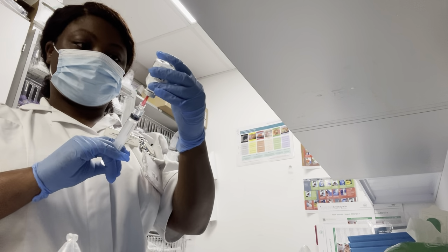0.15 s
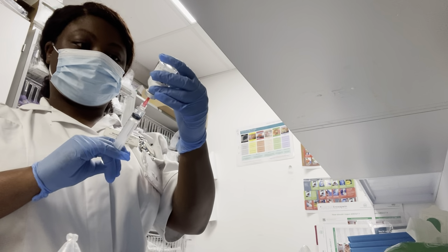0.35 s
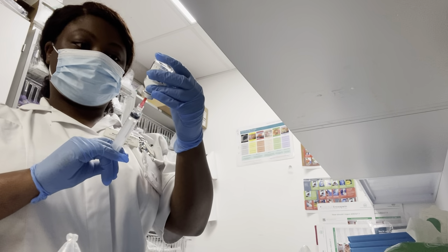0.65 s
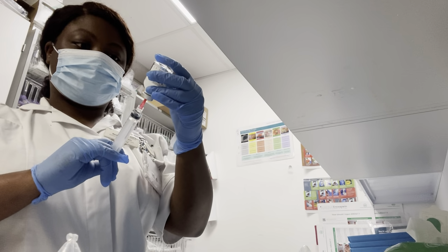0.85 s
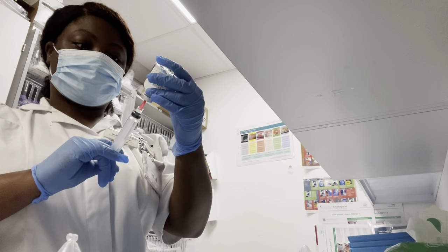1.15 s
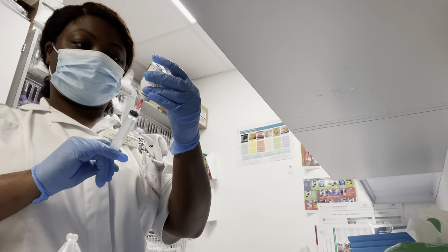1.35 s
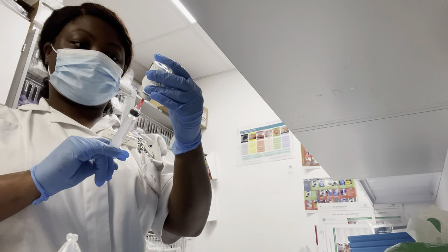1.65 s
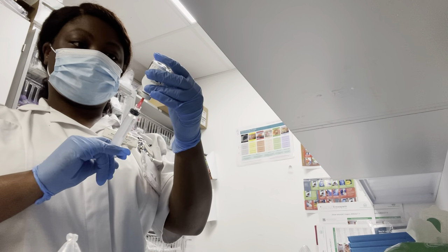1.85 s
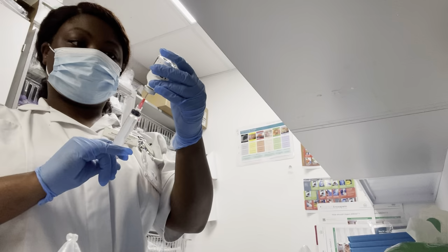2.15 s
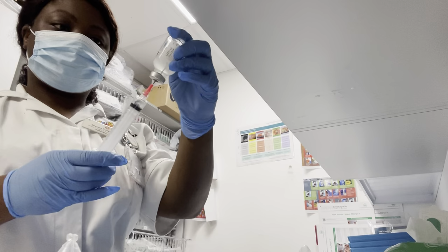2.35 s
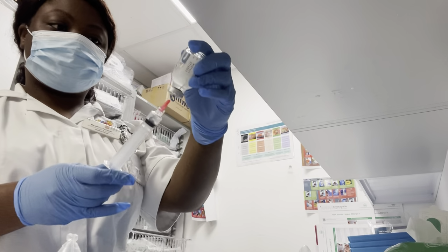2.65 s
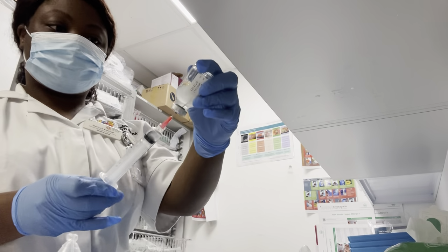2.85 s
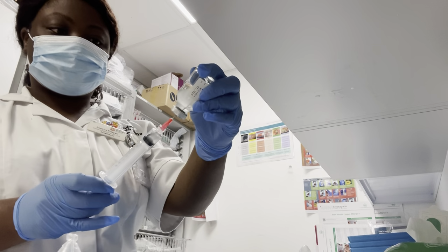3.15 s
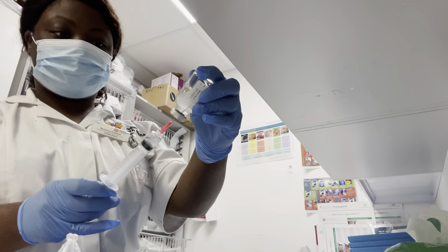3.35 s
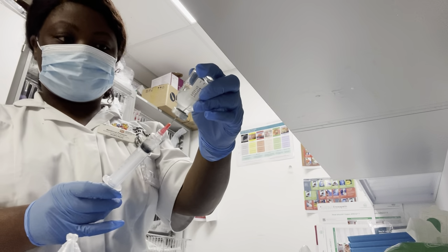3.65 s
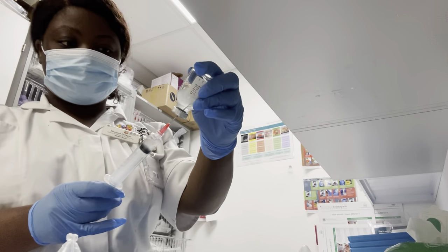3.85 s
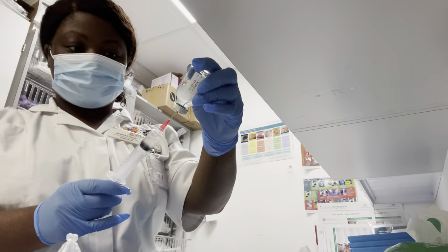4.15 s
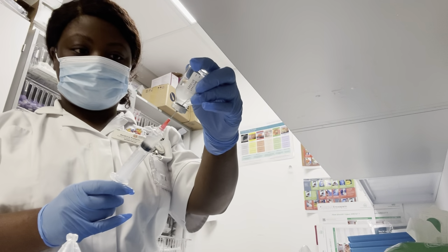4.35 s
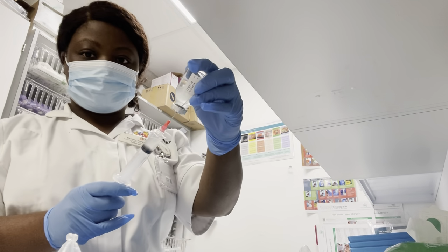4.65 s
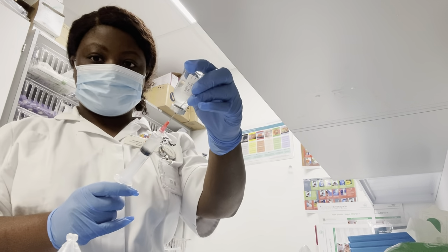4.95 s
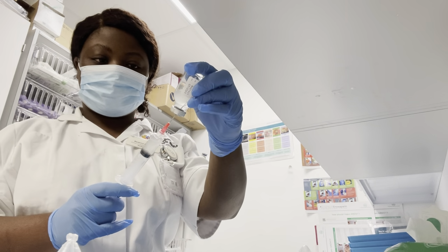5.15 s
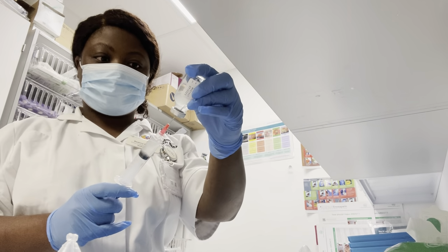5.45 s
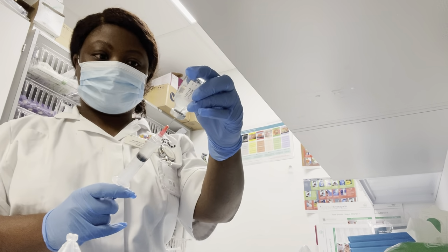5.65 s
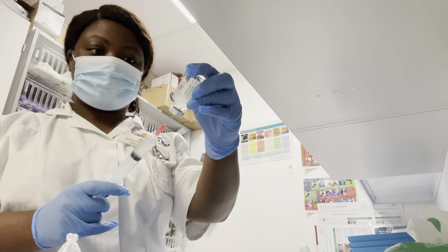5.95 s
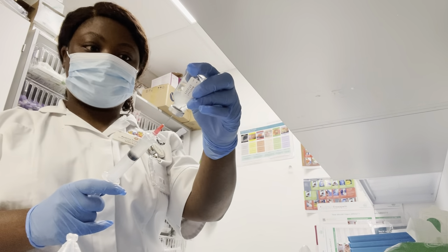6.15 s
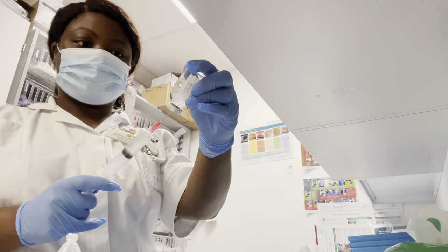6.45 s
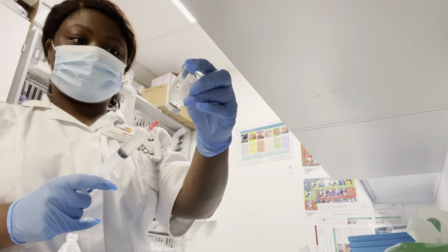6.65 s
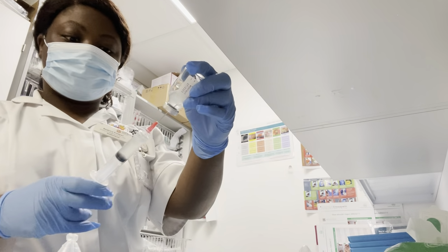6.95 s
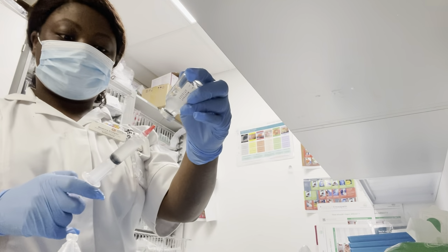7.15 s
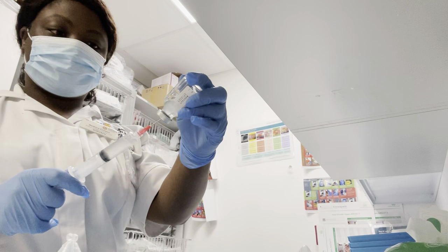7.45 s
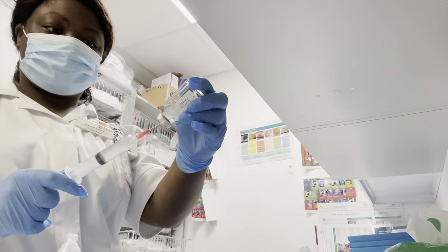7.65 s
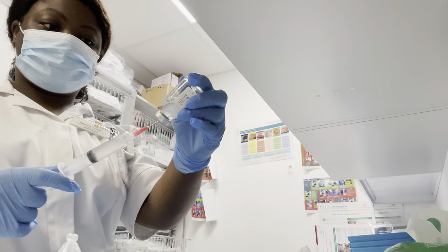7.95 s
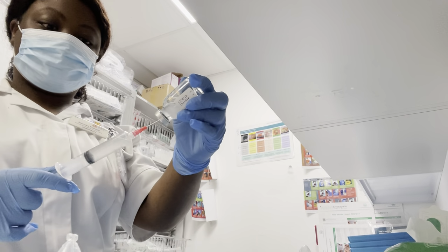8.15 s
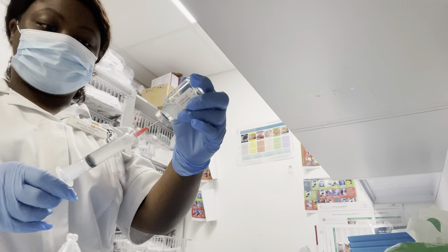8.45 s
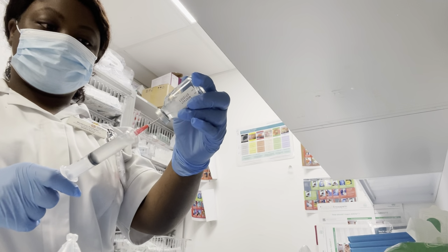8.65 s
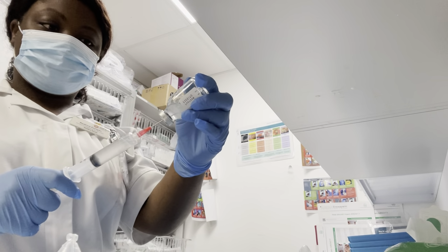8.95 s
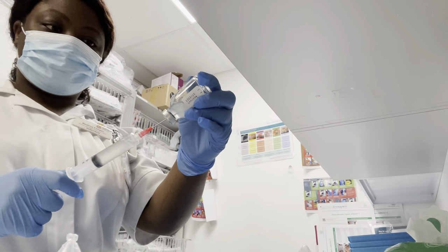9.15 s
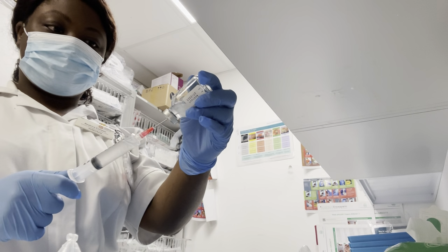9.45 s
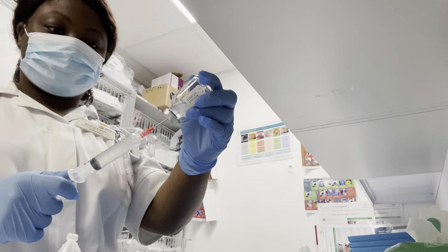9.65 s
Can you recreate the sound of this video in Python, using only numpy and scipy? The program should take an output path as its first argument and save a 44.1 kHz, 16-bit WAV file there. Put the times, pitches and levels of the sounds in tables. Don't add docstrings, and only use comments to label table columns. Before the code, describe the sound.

An air conditioner hums low and steadily in a small hard-walled room, with rumbling air, faint thin whine and soft hiss. Close to the stereo microphone, rubber gloves rustle quietly and a plastic syringe clicks on a glass vial. The sound dips to silence for an instant after two seconds, then returns; two louder snaps follow near three seconds, then scattered tiny plunger ticks.

```python
import sys
import numpy as np
from scipy import signal
from scipy.fft import rfft, irfft, next_fast_len
from scipy.io import wavfile
from scipy.ndimage import uniform_filter1d, map_coordinates

SR = 44100
rng = np.random.default_rng(int(sys.argv[2]) if len(sys.argv) > 2 else 0)


def to_linear_factor(level_db):
    exponent = np.asarray(level_db, float) / 20
    return 10 ** exponent


def generate_wav(sig):
    pcm = np.round(np.clip(np.atleast_2d(sig).T, -1, 1) * 32767).astype(np.int16)
    wavfile.write(sys.argv[1], SR, pcm)


N = 432621
DIP_S = 2.39
# start_s, level_db, dulling_db_per_octave, rise_s
HUB_SNAPS = [
    (2.8818, 4.5, -3.5, .002),
    (3.0911, 2, 0.3, .00015),
]


def unit(x):
    return x / np.sqrt(np.mean(x ** 2) + 1e-20)


def along(points, hz):
    f, v = np.transpose(points)
    return np.interp(np.log(hz + 1), np.log(f + 1), v)


def curves(rows):
    s, *cols = np.transpose(rows)
    return [np.interp(np.arange(N) / SR, s, c) for c in cols]


def wobble(rate_hz):
    knots = rng.standard_normal(int(N * rate_hz / SR) + 4)
    return map_coordinates(knots, [np.arange(N) * rate_hz / SR])


def filtered(x, response):
    m = next_fast_len(N + 8192)
    return irfft(rfft(x, m) * response(np.fft.rfftfreq(m, 1 / SR)), m)[..., :N]


def closed(spectrum):
    return [(spectrum[0][0] * .8, -120), *spectrum, (spectrum[-1][0] * 1.1, -120)]


def ports(pair, near=False):
    # hz, left_over_right_db
    lean_points = [(40, -0.5), (99, -2.5), (160, -4), (270, -5), (400, -6), (740, 1), (1000, 3),
                   (1400, -1.5), (2300, 4), (3330, 0.5), (5500, -2), (9080, 0), (15000, 0)]
    # hz, lead_rad
    lead_points = [(60, .05), (200, .35), (320, .6), (420, 2), (1000, 2.8), (2000, 2.4), (2500, 0),
                   (7000, 0), (8000, .7), (9000, 1.7), (10300, 3), (11500, 3.3), (12500, 4.4), (13800, 5.9),
                   (15000, 6.28)]
    half = np.array([[.5], [-.5]])
    lead = lead_points[6:] if near else lead_points
    return filtered(pair, lambda hz: to_linear_factor(half * along(lean_points, hz)) * np.exp(1j * half * along(lead, hz)))


def rush(spectrum, source):
    # hz, left_right_likeness
    likeness = [(60, .995), (220, 0.93), (300, 0.68), (400, 0.54), (480, 0.28), (800, 0.56), (1000, 0.14),
                (1450, 0.43), (2500, .25), (6000, 0.18), (7500, 0.95), (9200, 0.41), (11000, 0.83),
                (15000, .9)]
    # hz, width_hz, gain_db
    casing_panels = [(529, 10, 3.5), (862, 13, 5.5), (958, 14, 5), (1050, 24, 3), (1208, 33, 5),
                     (1470, 23, -3), (1505, 17, 3)]

    def spread(hz):
        turn = np.arccos(np.clip(along(likeness, hz), -1, 1)) / 2
        panels_db = sum(db * np.exp(-((hz - c) / w) ** 2) for c, w, db in casing_panels)
        return to_linear_factor(along(spectrum, hz) + panels_db) * [np.cos(turn), np.sin(turn)]

    common, opposed = filtered(source, spread)
    return unit(ports(np.array([common + opposed, common - opposed])))


def tone(phase, left_db, lean_db, lag, unsteady_db):
    level = to_linear_factor(left_db + unsteady_db * wobble(2)) * np.sqrt(2)
    return level * np.array([np.sin(phase + lag), to_linear_factor(-lean_db) * np.sin(phase)])


def motor():
    # mains_hum_multiple, left_db, left_over_right_db, left_lead_rad
    iron_hum = [(1, -36.5, -3.1, .08), (2, -24.1, -5.5, .36), (4, -66, -12, 2.4), (6, -61, -4, 2.5)]
    shaft_orders = [18, 20, 32, 43, 57, 58, 59, 60, 61, 62, 64, 65, 66, 67, 73, 116, 119, 120, 158]
    # left_db, left_over_right_db, left_lead_rad
    order_levels = [(-70, -3.5, 4), (-65.5, 8.5, 2), (-71, -2, 2), (-80, 9.5, -1.5), (-76.5, -0.5, 1),
                    (-71, -5.5, 0), (-80.5, -3, 0.5), (-79, -4, -1.1), (-66, 3.5, -1), (-80, 4, 2),
                    (-79, 7.5, 2), (-81.5, 1.5, 2), (-80, 7, -4.5), (-74.5, -6, 2.8), (-82.5, -1.5, -0.3),
                    (-92.5, -10, 2.5), (-88.5, -8, 2), (-94.5, -5.5, 3.5), (-87.5, -2, -7)]
    # hz, left_db, left_over_right_db, left_lead_rad
    fan_tones = [(460.3, -57, 1, -1.9), (1073.3, -68, -5, .7), (11800.2, -92, -3, -.4),
                 (12199.9, -95, -5, .2)]
    # time_s, level_db
    panel_tone = [
        (0, -53),
        (2.36, -54),
        (2.42, -64),
        (3.0, -55.5),
        (3.35, -60),
        (4.2, -56),
        (5.7, -55),
        (7.4, -55.5),
        (8.4, -62.5),
        (9.81, -62),
    ]
    mains_hz, shaft_hz, panel_hz = 99.885, 48.668, 1364.3
    dip_turn_rad = 0.67
    t = np.arange(N) / SR
    mains = 2 * np.pi * mains_hz * t + dip_turn_rad / 2 * (t > DIP_S) + 0.012 * wobble(1)
    shaft = 2 * np.pi * shaft_hz * t + .012 * wobble(2.5)
    hum = sum(tone(k * mains, db, lean, lag, unsteady_db=0.8) for k, db, lean, lag in iron_hum)
    whine = sum(tone(k * shaft + rng.uniform(0, 2 * np.pi), db, lean, lag, unsteady_db=.8)
                for k, (db, lean, lag) in zip(shaft_orders, order_levels))
    fan = sum(tone(2 * np.pi * hz * t + .6 * wobble(1.5), db, lean, lag, unsteady_db=3.0)
              for hz, db, lean, lag in fan_tones)
    panel_db, = curves(panel_tone)
    panel_phase = 2 * np.pi * panel_hz * t + .7 * wobble(3.1)
    return hum + whine + fan + tone(panel_phase, panel_db - 1.5, 2.4, -.4, unsteady_db=1.2)


def air():
    # hz, density_db_per_hz
    rumble_spectrum = [(18, -48.5), (33, -25.5), (46, -6.5), (80, -10.5), (110, -9), (125, -3), (146, -3.5),
                       (161, -9), (186, -2), (225, -4.5), (278, -8.5), (330, -9.5), (390, -18), (430, -25)]
    # hz, density_db_per_hz
    casing_spectrum = [(250, -36.5), (420, -5.5), (430, -7.5), (493, 0.5), (566, -6), (592, -3),
                       (690, -9.5), (767, -4.5), (828, -14.5), (1050, -12), (1290, -17), (1320, -16.5),
                       (1400, -10), (1430, -13.5), (2600, -26.5), (3380, -53), (5720, -120)]
    # hz, density_db_per_hz
    grille_spectrum = [(2300, -14), (2660, -0.5), (2900, 5), (3200, 2), (4000, -1), (5000, -5.5),
                       (6000, -7.5), (7000, -11), (8000, -9.5), (9500, -13.5), (11300, -18.5), (12200, -19),
                       (14000, -24.5), (15800, -24.5)]

    def flow(spectrum):
        return rush(closed(spectrum), rng.standard_normal((2, N)))

    rumble = to_linear_factor(-31 + 0.27 * wobble(2.5)) * flow(rumble_spectrum)
    casing = to_linear_factor(-41.0 + 0.52 * wobble(2.2)) * flow(casing_spectrum)
    grille = to_linear_factor(-58.5 + 0.43 * wobble(8.2)) * flow(grille_spectrum)
    return rumble + casing + grille


def gloves():
    # start_s, hold_s, level_db, soft_over_crisp_db
    strokes = [(0.786, .08, -86, 14), (0.929, 0.0088, -70.5, 8), (0.998, .01, -77, 3),
               (1.233, .06, -76.5, 15), (6.7, .06, -74, 6), (1.921, .02, -80, 6), (2.269, .03, -85.5, 13),
               (2.593, .02, -73.5, 13), (2.819, .07, -70.5, 10.5), (3.277, .14, -79, 12.5),
               (3.595, 0.0091, -66.5, 9), (3.975, .1, -84, 19), (4.117, .14, -77, 2),
               (4.595, .01, -71.5, 15), (4.765, .025, -72, 23), (4.929, .03, -76.5, 14),
               (5.172, .025, -69, 9), (5.29, 0.033, -77.5, 14), (5.501, .36, -80, 13.5),
               (5.594, .02, -70, 7), (6.261, .02, -76.5, 8.5), (6.6, .17, -75, 12),
               (6.927, 0.027, -67.5, 10), (7.143, .015, -68, 10.5), (7.593, .01, -71.5, 12),
               (7.716, .4, -77, 16.5), (8.217, .04, -69, 11), (8.314, .03, -72, 12), (8.422, .19, -74, 10),
               (9.592, 0.18, -77.5, 14)]
    # hz, density_db_per_hz
    crisp_spectrum = [(7000, -20), (9000, -3), (11000, 2), (13500, -1), (15800, -2.5)]
    # hz, density_db_per_hz
    soft_spectrum = [(1800, -10), (3000, -5), (5500, -2.5), (7500, -2), (9500, -4), (11000, -16.5)]
    rise_db_per_s, fall_db_per_s = 700, 419.5
    resting_db, resting_soft_db, fidget_db = -84, 8, 2
    t = np.arange(N) / SR
    crisp_gain = to_linear_factor(resting_db + fidget_db * wobble(9))
    soft_gain = to_linear_factor(resting_soft_db) * crisp_gain
    for s, hold, db, soft_db in strokes:
        near = slice(max(round((s - .2) * SR), 0), round((s + hold + .3) * SR))
        rise_db = rise_db_per_s * np.minimum(t[near] - s, 0)
        fall_db = fall_db_per_s * np.maximum(t[near] - s - hold, 0)
        stroke = to_linear_factor(db + rise_db - fall_db)
        crisp_gain[near] += stroke
        soft_gain[near] += to_linear_factor(soft_db) * stroke
    clumps = to_linear_factor(4.4 * wobble(820) + .7 * wobble(40))
    crisp = to_linear_factor(4) * crisp_gain * rush(closed(crisp_spectrum), clumps * rng.standard_normal((2, N)))
    soft = to_linear_factor(-4.5) * soft_gain * rush(closed(soft_spectrum), clumps * rng.standard_normal((2, N)))
    return crisp + soft


def contact(t, db, hz, t60):
    crack_db, knock_db, knock_db_per_octave = 3.5, -2, 0
    grit, rough = rng.standard_normal((2, len(t)))
    ring = to_linear_factor(db + 4 * rough) * np.sin(2 * np.pi * hz * t)
    crack = to_linear_factor(db + crack_db) * signal.lfilter([.45], [1, -.62], grit)
    barrel = sum(g * np.sin(2 * np.pi * f * t) for f, g in [(1600, 1), (1080, .5), (2500, .35)])
    knock = to_linear_factor(db + knock_db + knock_db_per_octave * np.log2(hz / 3000)) * barrel
    rise = 1 - np.exp(-t / (0.018 * t60))
    return rise * ((crack + ring) * to_linear_factor(-60 * t / t60) + knock * to_linear_factor(-35 * t / t60))


def snaps(t):
    # hz, level_db, t60_s
    hub_modes = [(1050, -32.5, .016), (1600, -32.5, 0.018), (2040, -31.5, 0.009), (2700, -33, .009),
                 (3470, -30, 0.0093), (4700, -35, 0.0067), (5760, -37, 0.0054), (7100, -34, 0.0096),
                 (8540, -33.5, .008), (9300, -29, .007), (11000, -35, .006), (12500, -39, .005),
                 (14000, -38, .006), (15200, -40, .005)]
    # delay_s, level_db
    surfaces = [(.0018, -8), (.0041, -19), (.0083, -22)]
    crack_t60_s = .005
    for s, level_db, dull_db, rise in HUB_SNAPS:
        modes = sum(to_linear_factor(db + dull_db * abs(np.log2(hz / 1800)) - 60 * t / t60) * np.sin(2 * np.pi * hz * t)
                    for hz, db, t60 in hub_modes)
        grit = signal.lfilter([1], [1, -.55], rng.standard_normal(len(t)))
        crack = to_linear_factor(-27 + 1.5 * dull_db) * to_linear_factor(-60 * t / crack_t60_s) * grit
        blow = to_linear_factor(level_db) * (modes + crack) * (1 - np.exp(-(t / rise) ** 2))
        yield from [(s + delay, to_linear_factor(db) * blow) for delay, db in [(0, 0), *surfaces]]


def wall_answer(t, db):
    bright = np.diff(rng.standard_normal((2, len(t))), prepend=0)
    return to_linear_factor(db - 60 * t / 0.094) * bright * (1 - np.exp(-t / 0.0026))


def clicks():
    # start_s, level_db, ring_hz, t60_s
    contacts = [(1.236, -51.5, 7820, .02), (1.29, -56.5, 7640, .03), (2.576, -52, 5590, .03),
                (2.592, -48.5, 2610, 0.03), (3.586, -51, 5480, .027), (3.592, -51, 5530, .025),
                (4.591, -52, 7860, .02), (4.762, -50, 5900, .04), (4.768, -47, 6980, .05),
                (5.178, -47, 2700, .05), (5.6, -54, 3300, 0.036), (6.19, -54, 2200, .09),
                (8.58, -56, 5500, .03), (9.584, -54, 5400, 0.013), (9.603, -47, 3380, .022),
                (9.647, -54, 8180, .012), (9.664, -53, 7450, .012), (9.678, -53, 8700, .012),
                (9.768, -56, 7950, .012)]
    # start_s, peak_db, ring_hz
    plunger_ticks = [(3.5899, -55, 7700), (3.958, -52.5, 8830), (3.986, -52, 8010), (4.019, -50.5, 9600),
                     (4.0476, -57, 6900), (4.221, -56.5, 7700), (4.592, -59, 7580), (4.7698, -43.5, 6900),
                     (5.021, -54, 8440), (5.0493, -57, 6800), (5.0743, -52, 8370), (5.1728, -56, 6870),
                     (5.5475, -60.5, 6710), (5.5862, -54.5, 8040), (5.647, -49, 8060), (5.6972, -54, 6650),
                     (5.8042, -48.5, 7960), (5.9788, -55.5, 7590), (6.356, -54.5, 7560),
                     (6.3836, -53.5, 7100), (6.439, -48, 8000), (6.571, -47.5, 7860), (6.637, -51.5, 8060),
                     (6.915, -54, 7980), (7.1506, -54, 7500), (7.673, -52.5, 8150), (7.8478, -53.5, 7840),
                     (7.981, -47.5, 8140), (8.0761, -53, 8700), (8.2116, -55, 7700)]
    direct, walls, t = np.zeros(N + SR), np.zeros((2, N + SR)), np.arange(SR // 10) / SR
    for s, db, hz, t60 in contacts:
        at = slice(round(s * SR), round(s * SR) + len(t))
        direct[at] += contact(t, db, hz, t60)
        walls[:, at] += wall_answer(t, db - 24.5)
    for s, level_db, *_ in HUB_SNAPS:
        walls[:, round(s * SR):][:, :len(t)] += wall_answer(t, level_db - 56.5)
    for s, sound in snaps(t):
        direct[round(s * SR):][:len(t)] += sound
    for s, db, hz in plunger_ticks:
        tick = to_linear_factor(db + 4.5 - 60 * t / 0.006) * np.sin(2 * np.pi * hz * t)
        direct[round(s * SR):][:len(t)] += tick
    return ports(to_linear_factor([[-.4], [.4]]) * direct[:N] + walls[:, :N], near=True)


def scene():
    return motor() + air() + gloves() + clicks()


def starved(x, from_hz, share):
    hz, t, z = signal.stft(x, SR, nperseg=1024)
    patches = rng.uniform(size=(2, len(hz) // 6 + 1, len(t)))
    patches = np.repeat(patches, 6, axis=1)[:, :len(hz)]
    level = np.abs(z) / np.median(np.abs(z), axis=2, keepdims=True).clip(1e-9)
    weak = uniform_filter1d(level, size=12, axis=1) < 2.2
    dropped = (patches < share) & weak & (hz[:, None] > from_hz)
    return signal.istft(z * np.where(dropped, .03, 1), SR, nperseg=1024)[1][:, :N]


def band_limit(x):
    return signal.sosfilt(signal.butter(12, 16360, fs=SR, output="sos"), x)


def record(dry):
    fade_s, mid_top_hz, side_top_hz = 0.034, 15800, 13800
    fade = np.clip(np.abs(np.arange(N) / SR - DIP_S) / fade_s, 0, 1) ** 1.08
    both = fade * np.array([dry[0] + dry[1], dry[0] - dry[1]]) / 2
    both = filtered(both, lambda hz: hz < np.array([[mid_top_hz], [side_top_hz]]))
    mid, side = starved(both, from_hz=12300, share=.4)
    return band_limit(np.array([mid + side, mid - side]))


dry = scene()
out = record(dry)
generate_wav(out)
```